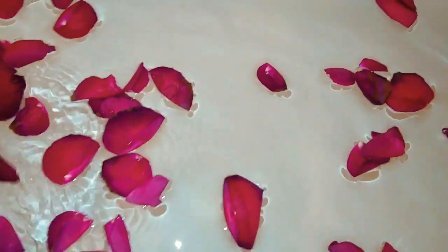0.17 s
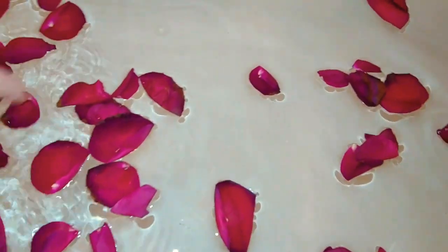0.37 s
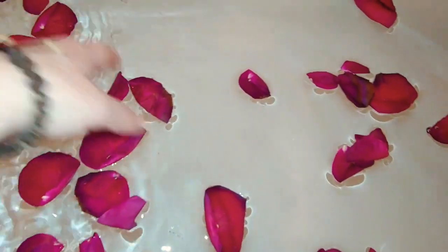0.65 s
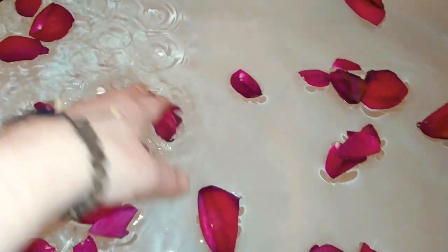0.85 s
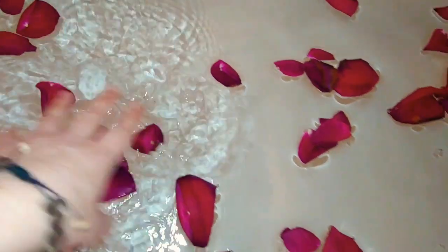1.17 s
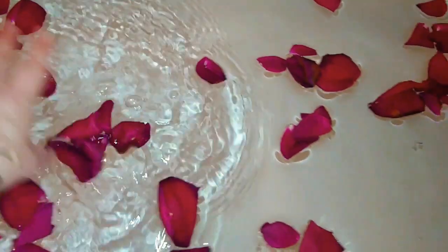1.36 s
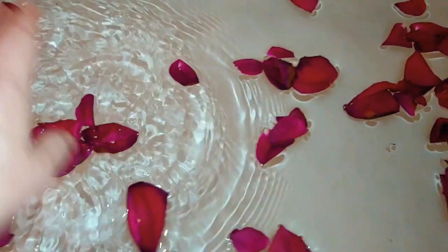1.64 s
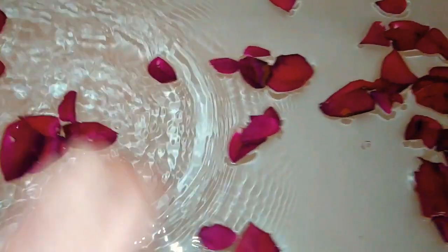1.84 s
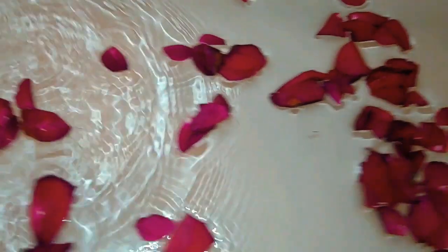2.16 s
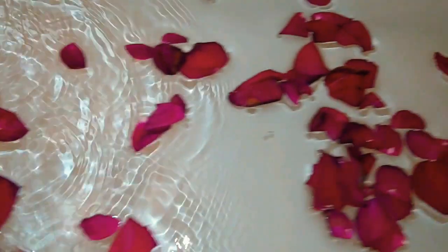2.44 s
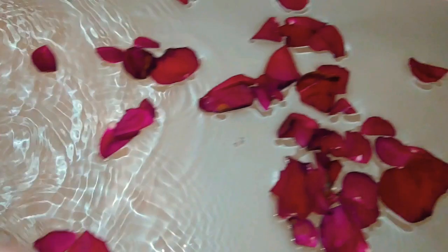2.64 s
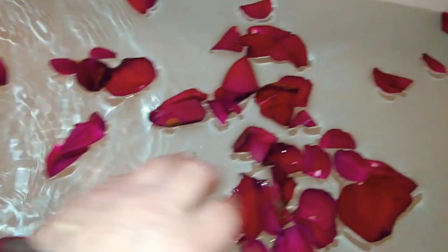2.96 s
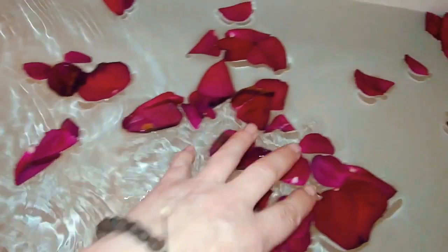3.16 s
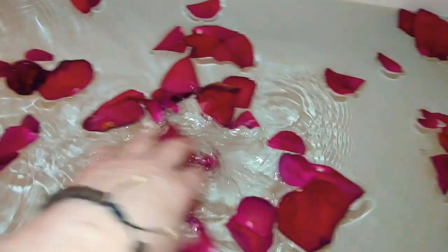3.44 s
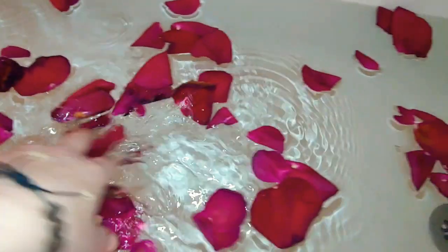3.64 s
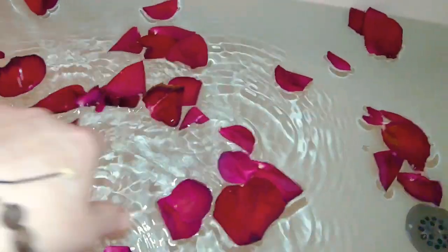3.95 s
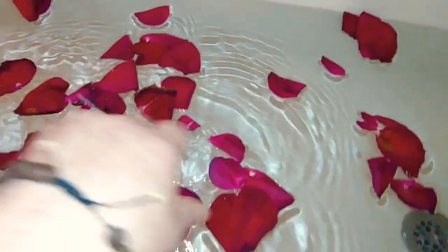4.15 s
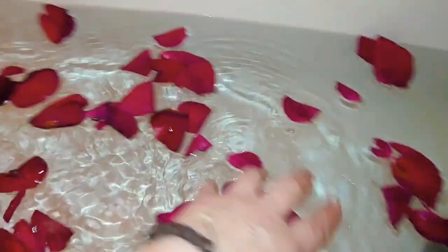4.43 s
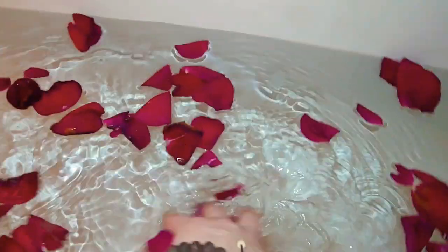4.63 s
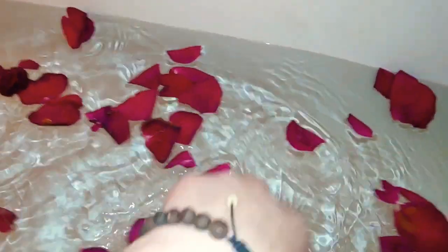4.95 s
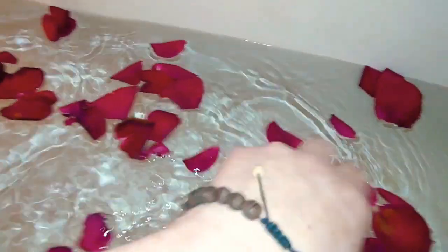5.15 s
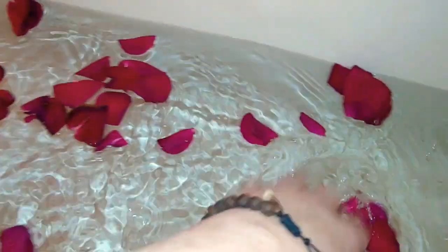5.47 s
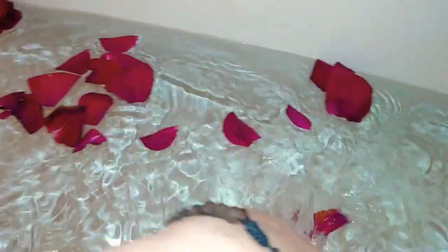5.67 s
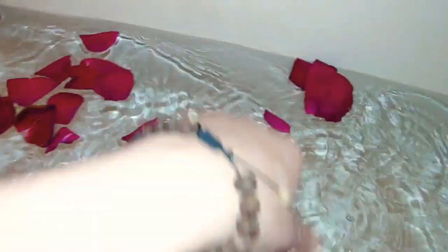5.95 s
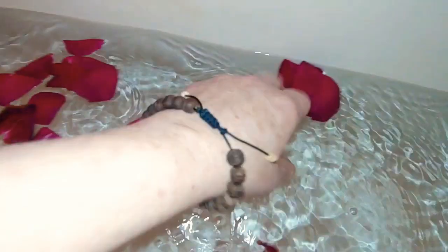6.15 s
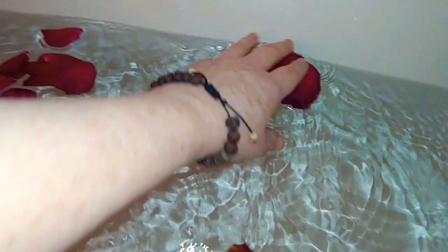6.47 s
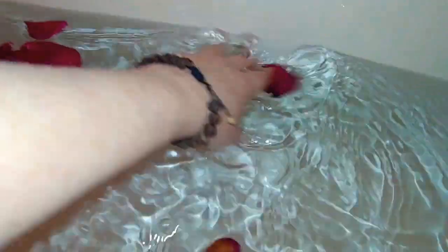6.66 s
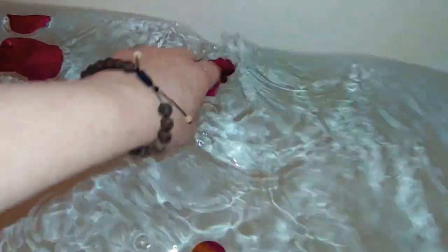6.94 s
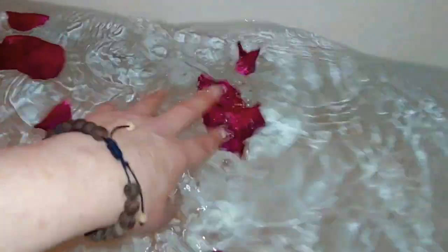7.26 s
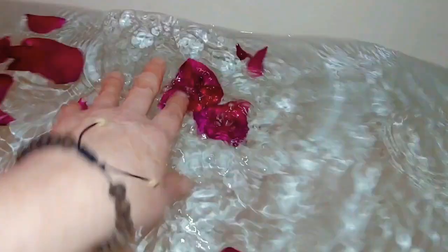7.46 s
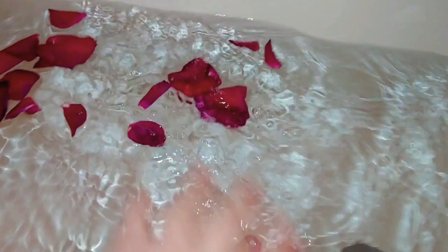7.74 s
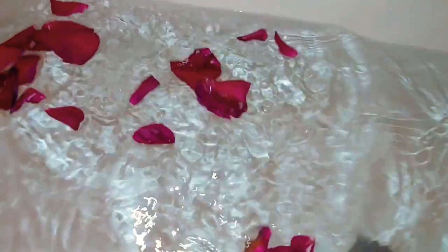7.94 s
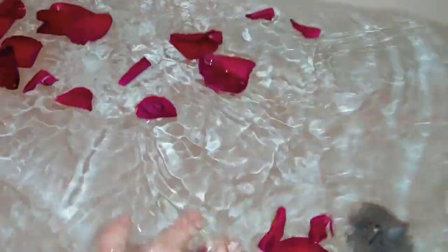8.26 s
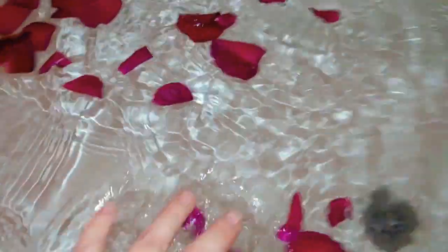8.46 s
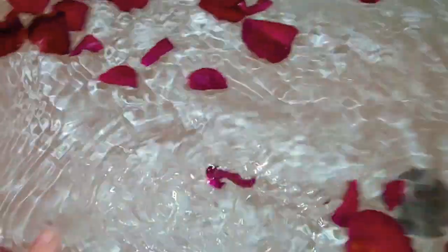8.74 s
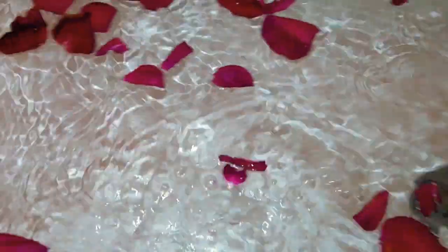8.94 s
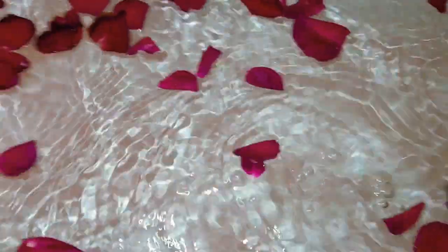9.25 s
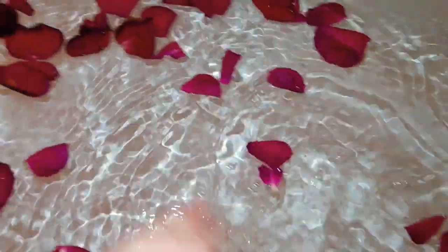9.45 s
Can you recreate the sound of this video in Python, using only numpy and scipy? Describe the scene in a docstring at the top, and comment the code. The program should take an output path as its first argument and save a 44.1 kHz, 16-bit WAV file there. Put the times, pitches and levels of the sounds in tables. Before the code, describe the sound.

A hand stirs a full bathtub in a small tiled bathroom, close to the microphone, with short lively echoes and a quiet steady mains hum and hiss beneath. At 0 to 0.4 s there are light bubbles; a soft low thump and rush of water come at 0.5. Quiet ripples and faint swishes follow until about 2.1, when a stroke brings bright, sharp plops at 2.3 and 2.5. A short water rush rises near 3.1, then gurgling splashes at 3.6 to 3.9. Bubbly slaps return at 4.7 to 4.9, with a dull thump at 5. A hard bright splash cracks at 5.8. Deep thumps and low glugging plops roll through 6.7 to 7.4, then sloshing and drips continue. The last strong slap and plop hit at 8.35, fading into small bubbles, droplets and a lighter splash near 9.3.

```python
"""In a small tiled bathroom, a hand swishes through a filled tub close to the microphone.
Each stroke traps air, which rings as rising bubbles, and throws up crackling spray made of noise.
Sharp slaps crack, drops fall off the hand, and noise shaped into soft low thumps rumbles.
Echoes of the tub and tiles surround the water, over a steady mains hum and hiss."""
import sys
import numpy as np
from scipy import signal
from scipy.fft import rfft, irfft
from scipy.io import wavfile

SR = 44100
rng = np.random.default_rng(int(sys.argv[2]) if len(sys.argv) > 2 else 0)


def unload_audio(sound):
    """Save the sound as a 16-bit wav file, at the path given as the first command line argument."""
    columns = np.transpose(np.atleast_2d(sound))
    # keep every value between -1 and 1, then stretch to whole-number steps
    steps = np.round(np.clip(columns, -1, 1) * 32767)
    wavfile.write(sys.argv[1], SR, steps.astype(np.int16))


N = 423360
TIME = np.arange(N) / SR  # s
BINS = np.fft.rfftfreq(N, 1 / SR)  # Hz

# All levels in the tables are as set before filters, mixing gains and echoes.
# Steady room hiss, tone colour: [f/Hz, level/dB per Hz, relative]
HISS_COLOUR = [(20, 2), (45, 6.5), (110, -7), (300, -14), (1100, -23.5), (2700, -18), (3550, -34.5),
               (4400, -30.5), (8000, -45.5), (16000, -84)]
# How long the tiled room rings, time to fall 60 dB: [f/Hz, t60/s]
ROOM_RING = [(100, 0.41), (400, 0.72), (1500, 0.47), (4000, 0.21), (14000, 0.41)]
# How alike left and right sound, 1 is identical: [f/Hz, likeness]
LIKENESS = [(60, 0.77), (250, 0.59), (600, 0.24), (1200, 0)]
# Soft blows: [t/s, rumble level/dB, upper edge f/Hz, t60/s, water rush level/dB]
BLOWS = [(0, -40.5, 550, 1.14, -43), (.491, -26, 448, 0.21, -30.5), (0.519, -31.5, 340, 0.81, -49),
         (1.521, -50, 303, 0.81, -52), (2.324, -31.5, 573, 0.89, -54), (2.612, -31, 530, 0.73, -37),
         (3.12, -40, 510, 0.86, -29), (3.852, -26.5, 437, 0.78, -31.5), (5.005, -30, 440, 0.81, -36),
         (6.16, -29, 29.4, 1.44, -70), (6.673, -26, 95, 1.24, -38.5), (6.949, -20.5, 110, 0.62, -49),
         (7.041, -32, 87.4, 1.65, -67)]
# Sharp slaps and bursting drops: [t/s, level/dB]
CRACKS = [(0.493, -24.5), (2.273, -18), (2.455, -18), (3.123, -35), (3.607, -21), (4.136, -30.5),
          (4.816, -20.5), (4.885, -29), (5.826, -17), (5.832, -12.5), (6.089, -30), (6.961, -24.5),
          (7.049, -26), (7.158, -23.5), (7.322, -22.5), (7.783, -28.5), (8.109, -31), (8.196, -31),
          (8.212, -22), (8.36, -12.5), (8.94, -34), (9.277, -20)]
# Spray, tone colour: [f/Hz, level/dB per Hz, relative]
SPRAY_COLOUR = [(80, -42), (300, 2), (900, 13.5), (2000, 14.5), (2900, 4.5), (3500, 21.5), (3850, 13.5),
                (4400, -2), (6000, -1), (8000, -10), (16000, -9.5)]
# Soft wash, tone colour: [f/Hz, level/dB per Hz, relative]
WASH_COLOUR = [(60, -30), (170, -33), (330, 5.5), (600, -11.5), (1000, 5.5), (1800, -12.5), (2700, -4),
               (4500, -62), (9000, -37)]
# Strength of small bubbles by pitch: [f/Hz, level/dB, relative]
SMALL_BUBBLES = [(430, -10.5), (850, 4), (1400, -0.5), (2100, 6), (2800, 3), (3600, -32)]
# Strokes of the hand: [entry t/s, gathers speed for/s, pushes on for/s, level/dB]
HAND_STROKES = [(-.05, 0.13, 0.31, -42.5), (.76, 0.24, 0.067, -57), (1.25, 0.29, 0.032, -57.5),
                (2.121, 0.16, 0.23, -39), (3.418, 0.04, 0.016, -38), (3.6, 0.07, 0.19, -37),
                (4.63, 0.11, .17, -36.5), (5.58, 0.032, 0.39, -45.5), (5.808, 0.0067, 0.022, -33.5),
                (6.21, 0.017, 0.0078, -40.5), (6.65, 0.19, 0.13, -47), (7.14, .16, 0.053, -36.5),
                (7.48, 0.1, 0.072, -38.5), (8.09, 0.13, 0.024, -38.5), (8.349, 0.0083, 0.03, -31.5),
                (9.06, 0.18, 0.035, -40.5), (9.521, 0.0091, .01, -46)]
# Large bubbles: [t/s, starting f/Hz, peak level/dB, starting pitch rise/octaves per s]
LARGE_BUBBLES = [ (.078, 1194, -29, 1.5), (.116, 844, -35.5, 1), (.151, 408, -37, 6.5),
                 (.307, 1570, -27, 0), (.312, 778, -28, 5), (.997, 1900, -32, 2), (1.04, 408.4, -41, 14),
                 (1.539, 947, -40, 5.5), (2.2723, 3610, -6.5, 1.5), (2.306, 381, -28, 4.5),
                 (2.455, 1108, -18.5, 1), (2.525, 1000, -26, 15), (3.627, 470, -23.5, 18.5),
                 (3.667, 810, -31, 4.5), (3.704, 323, -22, -3.5), (3.745, 405, -22, 13.5),
                 (3.756, 813, -24, 7.5), (3.83, 591, -24.5, 13), (4.136, 1800, -29, 3),
                 (4.137, 2185, -30, 7), (4.71, 275, -26, -0.5), (4.713, 488.6, -23.5, 9),
                 (4.804, 1897, -17.5, 12), (4.823, 576, -14.5, 13), (4.874, 770, -28.5, 15),
                 (4.885, 1740, -15.5, -5.5), (5.621, 364, -24, 2.5), (5.635, 3510, -23, 0),
                 (5.717, 3710, -23.5, 0), (5.784, 790, -18.5, -2), (5.826, 2160, -7, -4.5),
                 (5.826, 790, -20, -4), (5.8315, 2730, -13.5, 4), (5.975, 596, -29.5, 4.5),
                 (6.087, 2560, -31, 12), (6.24, 823, -26, 10), (6.935, 675, -31, 11.5),
                 (6.952, 324, -24, 4), (6.968, 2070, -25, 9.5), (7.037, 486, -22.5, 11),
                 (7.157, 464, -22.5, 4.5), (7.268, 854, -25.5, 4.5), (7.317, 402, -17.5, 2.5),
                 (7.327, 376, -16.5, -2.5), (7.351, 370, -23, 1.5), (7.536, 1386, -29, 8),
                 (7.601, 902, -25, 3.5), (8.156, 2190, -28.5, 8), (8.211, 703, -24, 4),
                 (8.243, 572, -26, -0.5), (8.333, 340, -25, 1.5), (8.3598, 1170, -5, -10),
                 (8.379, 3530, -16.5, 15), (8.4, 1494, -13.5, 9), (8.539, 2410, -28, 2),
                 (8.644, 1044, -32.5, 11), (8.766, 1646, -32, 0), (9.242, 733, -33, 13),
                 (9.279, 1167, -29, 10), (9.356, 787, -30.5, 3), (9.539, 1080, -30, 42.5)]

HUM_HZ, HUM_DB, HISS_DB = 60, -56.5, -54
EDGE_HZ = 16250  # upper limit of the recorder


def amp(db):
    """Turns decibels into a plain multiplier."""
    return 10 ** (np.asarray(db) / 20)


def unit(x):
    """Scales a sound to an average (RMS) strength of one."""
    return x / np.sqrt(np.mean(x ** 2) + 1e-20)


def read(points, hz):
    """Reads between the rows of a table, on a log-frequency axis."""
    f, value = np.transpose(points)
    return np.interp(np.log(hz + 1), np.log(f), value)


def add(mix, s, sound):
    """Mixes in a stereo sound, starting at s seconds."""
    start = max(round(s * SR), 0)
    part = mix[:, start:][:, :sound.shape[1]]
    part += sound[:, :part.shape[1]]


def pan(db):
    """Left and right gains with a mean of one; negative db favours the right."""
    gains = amp([[db / 2], [-db / 2]])
    return gains / gains.mean()


def colour(x, spectrum):
    """Filters by a tone colour, keeping the power of white noise."""
    return irfft(rfft(x) * unit(amp(read(spectrum, BINS))), N)


def diffuse(x):
    """Long waves reach both microphone ports alike, short ones do not."""
    a, b = rfft(x)
    same = np.clip(read(LIKENESS, BINS), -1, 1)
    right = same * a + np.sqrt(1 - same ** 2) * b
    return irfft(np.array([a, right]), N)


def noise():
    """White noise arriving from all round."""
    return diffuse(rng.standard_normal((2, N)))


def fade(t, t60):
    """Natural dying away: down by 60 dB after t60 seconds."""
    return np.exp(-np.log(1000) * t / t60)


def hum():
    """Mains electricity hums as one steady pure tone."""
    return amp(HUM_DB) * np.sqrt(2) * np.sin(2 * np.pi * HUM_HZ * TIME)


def hiss(side_db=3.3):
    """The room's steady hiss is coloured noise, a little stronger on the left."""
    return amp(HISS_DB) * pan(side_db) * colour(noise(), HISS_COLOUR)


def bathroom(x, tub_db=-11, tub_t60=0.051, tail_db=-6, side_db=-2):
    """Quick echoes come off the tub walls, then the tiled room rings."""
    # about 2000 random echoes a second, after a 2 ms gap
    hits = (rng.random(N) < 2000 / SR) * (TIME > .002)
    near = diffuse(rng.standard_normal((2, N)) * hits)[:, :SR]
    near *= fade(TIME[:SR], tub_t60)
    # each pitch of the tail dies at its own speed
    hz, t, z = signal.stft(noise()[:, :SR], SR, nperseg=256)
    z = z * fade(t, read(ROOM_RING, hz)[:, None])
    tail = signal.istft(z, SR, nperseg=256)[1][:, :SR]
    tail *= np.minimum(TIME[:SR] / 0.014, 1)  # builds up over 14 ms
    echoes = (amp(tub_db) * unit(near) + amp(tail_db) * unit(tail)) / np.sqrt(SR)
    return x + pan(side_db) * signal.fftconvolve(x, echoes, axes=1)[:, :N]


def thumps(attack_s=0.01, low_hz=24, knee_hz=110, apart_db=-13):
    """Soft low blows swell quickly and rumble away, nearly alike at both ports."""
    out, t, hz = np.zeros((2, N)), TIME[:SR], np.fft.rfftfreq(SR, 1 / SR)
    for s, db, edge_hz, t60, _ in BLOWS:
        shape = hz ** 2 / (hz ** 2 + low_hz ** 2)  # weak at the very bottom
        shape = shape / np.hypot(1, hz / knee_hz) / np.hypot(1, (hz / edge_hz) ** 5)
        mid, side = rfft(rng.standard_normal((2, SR)))
        side = side * amp(apart_db) * np.minimum(hz / knee_hz, 4)
        rumble = unit(irfft(np.array([mid + side, mid - side]) * shape, SR))
        swell = 1 - np.exp(-t / attack_s)
        add(out, s, amp(db) * rumble * swell * fade(t, t60))
    return out


def rushes(decay_s=0.073, bright=0.74, side_db=-4):
    """A sheet of water hisses up with each blow and falls away."""
    level = np.zeros(N)
    for s, _, _, _, db in BLOWS:
        level += amp(db) * (TIME > s) * np.exp(-abs(TIME - s) / decay_s)
    water = (colour(noise(), WASH_COLOUR) + bright * colour(noise(), SPRAY_COLOUR)) / 2
    return pan(side_db) * level * water


def slaps(rise_s=0.00023, decay_s=0.0068, scatter=0.12, scatter_s=0.007, side_db=-5):
    """Water snaps shut in a crack of a few milliseconds and scatters into droplets."""
    out, t = np.zeros((2, N)), np.arange(SR // 8) / SR
    falling = np.exp(-t / decay_s) + scatter * np.exp(-t / scatter_s)
    shape = (1 - np.exp(-t / rise_s)) * falling
    for s, db in CRACKS:
        add(out, s, amp(db) * .5 * shape * rng.standard_normal((2, len(t))))
    return pan(side_db) * colour(out, SPRAY_COLOUR)


def stir(entry_db, settle_db_per_s, ripple_db):
    """Each stroke builds from entry_db relative to full strength, holds, then settles to ripples."""
    power = amp(ripple_db) ** 2
    for s, swell_s, hold_s, db in HAND_STROKES:
        t = TIME - s
        building = entry_db * np.clip(1 - t / swell_s, 0, 1)
        settling = settle_db_per_s * np.maximum(t - swell_s - hold_s, 0)
        power = power + (t > 0) * amp(db + building - settling) ** 2
    return np.sqrt(power)


def bubble(hz, t60, rise, side_db, wobble=0.092, wobble_cycles=3):
    """Trapped air rings; its pitch wavers as it deforms and, with positive rise, climbs near the surface."""
    t = np.arange(int(max(t60, .005) * SR)) / SR
    # a random bend in octaves, gentler for high pitches
    knots = rng.standard_normal(128)
    waver = np.interp(t * hz / wobble_cycles, np.arange(len(knots)), knots)
    waver = wobble * waver * min(1, np.sqrt(600 / hz))
    # the far microphone port hears it a little late
    late = 1.6e-5 * np.maximum([[-side_db], [side_db]], 0)
    t = np.maximum(t - late, 0)
    pitch = hz * 2 ** (np.tanh(rise * t) + waver)  # the glide levels off within an octave
    turns = np.cumsum(pitch * (t > 0), axis=1) / SR
    ring = (1 - np.exp(-turns ** 2)) * fade(t, t60)  # swells over its first cycle
    return pan(side_db) * ring / ring.max() * np.sin(2 * np.pi * turns)


def drips(count=220, low_hz=1000, high_hz=4000, drip_db=-1, spread_db=4, t60_s=0.018, tick_db=-4,
          side_db=-6):
    """Drops off the hand, lingering after each stroke: a faint tick and a tiny bubble's plink."""
    out = np.zeros((2, N))
    fizz = colour(noise(), SPRAY_COLOUR)
    for when, width, size, climb, place in rng.random((count, 5)):
        hz = low_hz * (high_hz / low_hz) ** width
        plink = bubble(hz, t60_s, 15 * climb, side_db + 16 * (place - .5))
        grain = fizz[:, int(when * N / 2):][:, :plink.shape[1]]
        tick = amp(tick_db) * abs(plink) * grain
        gain = amp(spread_db * min(-np.log(size), 2.5))
        add(out, when * N / SR, gain * (plink + tick))
    return amp(drip_db) * out * stir(entry_db=-2, settle_db_per_s=45.5, ripple_db=-57)


def spray(per_s=700, spread_db=4, drops_db=-12, fizz_db=-14, side_db=-6):
    """Tiny drops tick on the surface over a fine fizz."""
    size = amp(spread_db * np.minimum(rng.exponential(1, N), 3.5))
    drops = size * (rng.random(N) < per_s / SR)
    burst = signal.lfilter([1], [1, -np.exp(-1000 / SR)], drops)  # each fades in about 1 ms
    sound = (amp(drops_db) * unit(burst) + amp(fizz_db)) * noise()
    # spray flies as soon as the fingers touch
    skim = stir(entry_db=-9.5, settle_db_per_s=66.5, ripple_db=-54.5)
    return pan(side_db) * colour(sound * skim, SPRAY_COLOUR)


def gurgle(count=2600, low_hz=430, high_hz=3500, spread_db=5, ring_cycles=34, swarm_db=-5,
           wash_db=-11, side_db=-5):
    """A swarm of small ringing bubbles and a soft wash of noise follow the hand."""
    out = np.zeros((2, N))
    for when, width, size, damping, climb, place in rng.random((count, 6)):
        hz = low_hz * (high_hz / low_hz) ** width
        gain = amp(spread_db * min(-np.log(size), 2.5) + read(SMALL_BUBBLES, hz))
        t60 = ring_cycles * (.5 + damping) / np.sqrt(hz * 1000)  # small bubbles die sooner
        ringing = bubble(hz, t60, 12 * climb, side_db + 20 * (place - .5))
        add(out, when * N / SR, gain * ringing)
    wash = amp(wash_db) * pan(side_db) * colour(noise(), WASH_COLOUR)
    # air is dragged under only once the hand is deep
    depth = stir(entry_db=-21, settle_db_per_s=78, ripple_db=-61)
    return depth * amp(swarm_db) * (unit(out) + wash)


def plops(t60_at_1khz=0.038, count=4, shed_db=-10.5, shed_s=0.036, low_hz=230,
          side_at_1khz_db=-2.5, side_db_per_octave=-4):
    """Large bubbles ring longest, rising ones longer still; each sheds a few, mostly smaller ones."""
    out = np.zeros((2, N))
    for s, hz, db, rise in LARGE_BUBBLES:
        t60 = t60_at_1khz * (1000 / hz) ** 0.63 * (1 + rise / 12)
        # the smaller the bubble, the more it favours the right port
        side_db = side_at_1khz_db + side_db_per_octave * np.log2(hz / 1000)
        add(out, s, amp(db) * bubble(hz, t60, rise, side_db))
        for delay, smaller, loud in rng.random((count, 3)):
            ratio = min(2 ** (1.5 * smaller), 3700 / hz)  # starting pitch stays at or below 3700 Hz
            gain = amp(db + shed_db - 10 * loud * delay) / ratio ** .5
            gain = gain * min(1, np.sqrt(600 / hz))
            add(out, s + shed_s * delay, gain * bubble(hz * ratio, t60 / ratio, 10 * loud, side_db))
    low_cut = signal.butter(4, low_hz, "high", fs=SR, output="sos")
    return signal.sosfilt(low_cut, out)


def scene():
    """The water echoes in the bathroom; thumps, hum and hiss are added without echoes."""
    water = plops() + gurgle() + spray() + drips() + slaps() + rushes()
    return hum() + hiss() + thumps() + bathroom(water)


def record(dry):
    """The recorder's band limit: only sound below its upper edge passes."""
    low_pass = signal.firwin(511, EDGE_HZ, window=("kaiser", 9), fs=SR)
    return signal.oaconvolve(dry, low_pass[None], "same")


dry = scene()
out = record(dry)
unload_audio(out)
```